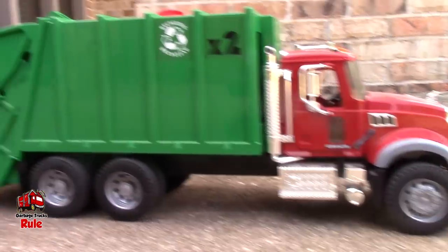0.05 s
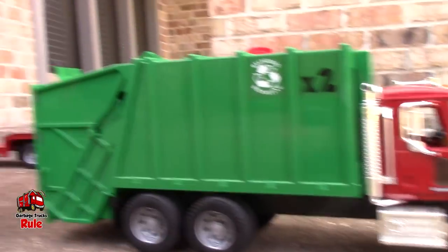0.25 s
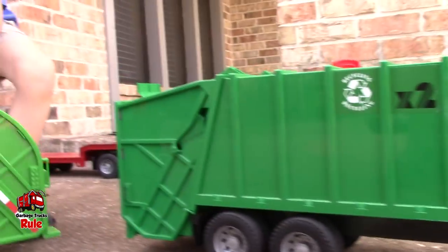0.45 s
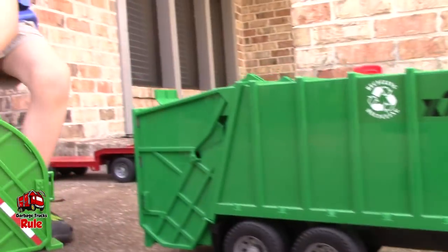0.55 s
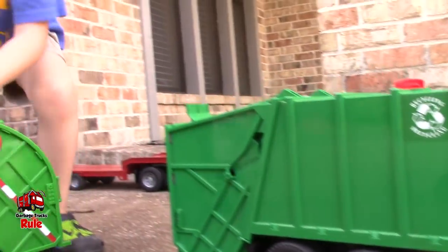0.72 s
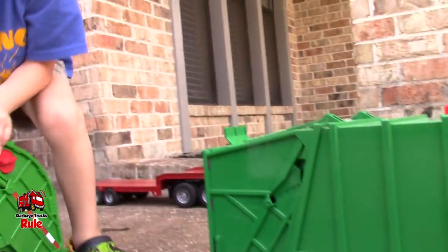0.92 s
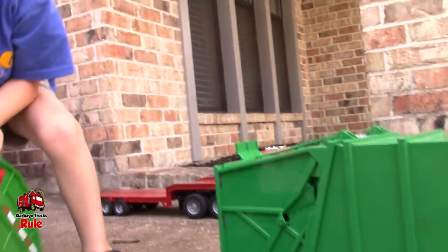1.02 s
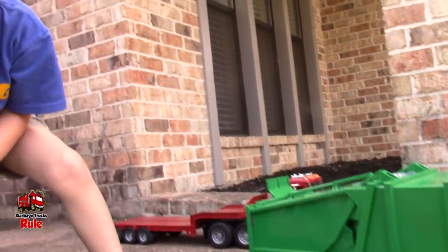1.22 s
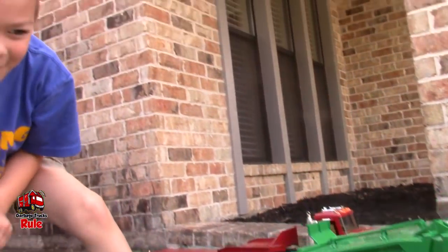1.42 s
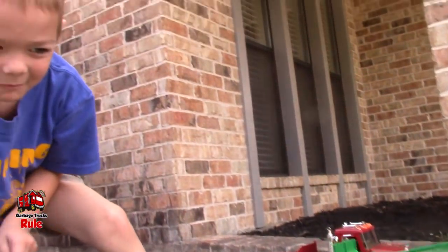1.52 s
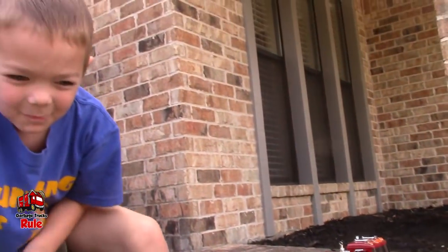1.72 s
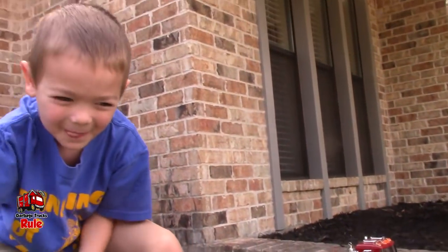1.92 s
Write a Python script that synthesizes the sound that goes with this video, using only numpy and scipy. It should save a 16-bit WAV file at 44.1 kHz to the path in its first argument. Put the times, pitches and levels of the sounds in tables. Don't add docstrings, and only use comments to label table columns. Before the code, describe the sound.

Hard plastic toy truck wheels rattle and rumble over rough concrete, then stop with a knock

```python
import sys
import numpy as np
from scipy import signal
from scipy.fft import rfft, irfft, next_fast_len
from scipy.io import wavfile

SR = 44100
rng = np.random.default_rng(int(sys.argv[2]) if len(sys.argv) > 2 else 0)


def wrap_up_sound(samples):
    columns = np.atleast_2d(samples).T
    tamed = np.clip(columns, -1, 1)
    steps = np.round(tamed * 32767).astype(np.int16)
    wavfile.write(sys.argv[1], SR, steps)


def field_ratio(decibels):
    return 10 ** (np.asarray(decibels, dtype=float) / 20)


N = 85995
GRIT_PER_S, CHATTER_PER_S = 1193, 3460

# pitch_hz, width_hz, level_db
BOX_MODES = [(288, 97, -7.5), (393.5, 90, -2.5), (460, 60.4, 0), (513, 48, -6), (592, 127, -6)]
# pitch_hz, width_hz, level_db
PANEL_MODES = [(711, 34, -0.5), (840, 67, 5), (1040, 53, 0), (1400, 121, 5.5), (1558, 360, 5.5),
               (2174, 560, 4), (2430, 197, 2), (2750, 330, 2), (3050, 75, -4), (3450, 100, -7.5),
               (3900, 750, -48)]
# frequency_hz, level_db_per_hz
PLASTIC_BULK = [(35, -99), (130, -2.5), (445, -8.5), (588, 2.5), (1050, 7.5), (1240, -2.5), (2870, -12.5),
                (7450, -33), (15700, -53)]


def rms_one(x):
    return x / np.sqrt(np.mean(x ** 2) + 1e-20)


def filtered(x, order, cutoff_hz, kind="low"):
    return signal.sosfilt(signal.butter(order, cutoff_hz, kind, fs=SR, output="sos"), x)


def colour(x, points):
    size = next_fast_len(N + 4096)
    hz = np.fft.rfftfreq(size, 1 / SR) + 1
    points_hz, points_db = np.transpose(points)
    gain = field_ratio(np.interp(np.log(hz), np.log(points_hz), points_db))
    cepstrum = irfft(np.log(gain), size)
    cepstrum[1:size // 2] *= 2
    cepstrum[size // 2 + 1:] = 0
    return irfft(rfft(x, size) * np.exp(rfft(cepstrum)), size)[..., :N]


def drift(rate_hz):
    r = np.exp(-2 * np.pi * rate_hz / SR)
    wander = signal.lfilter([1], [1, -2 * r, r * r], rng.standard_normal(N + SR))
    return rms_one(wander[SR:])


def resonate(x, pitch_hz, width_hz):
    r = np.exp(-np.pi * width_hz / SR)
    feed = np.sqrt((1 - r * r) / 2) * np.array([1, 0, -1])
    return signal.lfilter(feed, [1, -2 * r * np.cos(2 * np.pi * pitch_hz / SR), r * r], x + 1e-18)


def grains(per_s, spread_db=3.5):
    sizes = field_ratio(spread_db * np.minimum(rng.exponential(1, N), 4)) * rng.choice([-1, 1], N)
    contact = np.clip((per_s / SR - rng.random(N)) * 200, 0, 1)
    return rms_one(sizes * contact)


def body(modes, drive):
    gains = field_ratio(np.array(modes)[:, 2])
    total = np.zeros(N)
    for k, (pitch_hz, width_hz, _) in enumerate(modes):
        total += gains[k] * (-1) ** k * resonate(drive(k), pitch_hz, width_hz)
    return total / np.sqrt(np.sum(gains ** 2))


def rolling():
    # time_s, level_db
    roll_force = [(0, -55), (0.074, -31.5), (0.124, -42.5), (0.149, -26.5), (0.207, -43.5), (0.263, -29.5),
                  (.345, -31.5), (0.398, -25), (.62, -17), (.8, -14), (1.25, -14.5), (1.39, -22.5),
                  (1.427, -35), (1.612, -25), (1.618, -12), (1.668, -18), (1.699, -27.5), (1.95, -45.5)]
    time_s, force_db = np.transpose(roll_force)
    force_db = np.interp(np.arange(N) / SR, time_s, force_db)
    peak_db = force_db.max()
    upper_db = peak_db + 1.62 * (force_db - peak_db) + 3.34 * drift(41)
    grit = grains(GRIT_PER_S)

    def box_drive(k):
        return (grit + grains(GRIT_PER_S)) * field_ratio(force_db - 1 + 2 * drift(32))

    def panel_drive(k):
        return grains(GRIT_PER_S) * field_ratio(upper_db - 7.5)

    box = body(BOX_MODES, box_drive)
    panels = body(PANEL_MODES, panel_drive)
    bulk = field_ratio(upper_db - 5.5) * rms_one(colour(grains(CHATTER_PER_S), PLASTIC_BULK))
    return filtered(box + panels + bulk, 2, 6500)


def shaking(rows, level_db, accent_db):
    span = 8000
    out, t = np.zeros(N + span), np.arange(span) / SR
    tail = field_ratio(-15) * np.exp(-t / 0.026)
    for row, db, accent in zip(rows, level_db, accent_db):
        start, length_s = int(row[0] * SR), max(row[3], 0.001)
        head = field_ratio(accent) * np.exp(-(t / length_s) ** 2)
        rise = 1 - np.exp(-t / (0.00011 + 0.059 * length_s))
        out[start:start + span] += field_ratio(db) * rise * (head + tail)
    return out[:N]


def rattles():
    # start_s, level_db, treble_share_db, length_s, pitch_hz
    nudges = [(.022,-19.5,-8,0.0052,3900),(.0355,-24,-5,0.0036,3900),(.043,-14.5,-7.5,0.0041,3050),(.057,-44,0,0.017,3450),(.079,-10.5,-31,0.0066,1400),(.140,-23,-47,0.0077,1040),(.2165,-8,-30,0.0081,2730),(.270,-11,-32,0.021,1400),(.295,-9,-17.5,0.0072,3450),(.317,-34,-1,0.0044,7400),(.363,-26,2,0.0011,3900),(.371,-29,-11,0.0041,5700),(.380,-1.5,-32,0.006,2750),(.415,-11.5,-32,0.0097,1400),(.470,-7,-24,0.0054,1400),(.493,-30,0.5,0.0031,7400),(.506,-24,-14,0.0034,7400),(.525,-18,-47,0.021,2430),(.542,-1.5,-18.5,0.006,3450),(.562,-22,-15,0.0032,1400),(.592,2,-22.5,0.01,7400),(.628,-16,-11,0.0061,7400)]
    # start_s, level_db, treble_share_db, length_s
    bumps = [(0.6509, 4.5, -22.5, 0.027), (0.691, -7.5, -15, 0.078), (0.7477, -4, -11.5, 0.045),
             (0.8096, 6.5, -18, 0.0056), (0.851, -6, -26, 0.014), (0.896, -6.5, -17.5, 0.091),
             (0.9106, -14.5, -18, 0.042), (0.9285, -6, -10.5, 0.046), (0.947, -2, -36, 0.042),
             (0.9787, -10, -20, 0.0052), (1.0004, -23, -1, 0.011), (1.026, -3, -20, 0.062),
             (1.042, -7.5, -14, 0.071), (1.065, -27, -21, 0.026), (1.0844, -30, -9, 0.074),
             (1.1154, -6, -6, 0.029), (1.143, -19, -6, 0.013), (1.1772, 0, -23.5, 0.02),
             (1.2326, 2, -16, 0.023), (1.261, -10, -19, 0.062), (1.296, -13, -27, 0.021),
             (1.329, -16, -12, 0.0034), (1.3589, -3, -29, 0.011), (1.3765, -16, -21.5, 0.019)]
    # start_s, level_db, treble_share_db, length_s, pitch_hz
    settling = [(1.429,-29,-1.5,0.0076,5700),(1.464,-46,-2,0.0017,8900),(1.489,-36,1,0.011,4900),(1.519,-27,-5.5,0.0059,2420),(1.5212,-26.5,5.5,0.0012,4400),(1.617,-5,-31,0.012,830),(1.631,-7,-10,0.025,4400),(1.657,-3.5,-34,0.0048,2750),(1.717,-19,-9.5,0.01,2750),(1.753,-20.5,-3,0.0021,2750),(1.823,-16.5,-32,0.02,1040),(1.876,-64,18,0.0047,5700),(1.895,-25,-1,0.0023,7400),(1.917,-33.5,12,0.0013,3050),(1.942,-36,6,0.0047,5700)]
    # pitch_hz, width_hz, level_db
    axle_modes = [(4400, 330, -3), (4900, 57, -5.5), (5700, 390, -6), (7400, 250, -1.5), (8900, 3200, -4)]
    rows = [*nudges, *bumps, *settling]
    low_db, share_db = np.array([row[1:3] for row in rows]).T
    high_db, even_db = low_db + share_db, np.zeros(len(rows))
    favoured_hz = np.array([row[4] if len(row) > 4 else 20 for row in rows])
    chatter, ticks = grains(CHATTER_PER_S), grains(1706, spread_db=2)

    def ring(modes, level_db):
        def drive(k):
            octaves = np.log2(modes[k][0] / favoured_hz)
            favour = np.exp(-(octaves / 0.16) ** 2) - (favoured_hz > 20) / 4
            accent_db = 3 * rng.standard_normal(len(rows)) + 7 * favour
            return chatter * shaking(rows, level_db, accent_db)
        return body(modes, drive)

    def treble(x):
        return filtered(colour(x, PLASTIC_BULK), 2, 4200, "high")

    bulk = colour(chatter * shaking(rows, low_db - 18.5, even_db), PLASTIC_BULK)
    bulk = bulk / colour(chatter, PLASTIC_BULK).std()
    fizz = treble(ticks * shaking(rows, high_db - 1.5, even_db)) / treble(ticks).std()
    dull = ring(PANEL_MODES, low_db - 11.5) + ring(BOX_MODES, low_db - 15) + bulk
    return filtered(dull, 3, 3130) + ring(axle_modes, high_db - 12) + fizz


def thumps():
    # start_s, peak_db, rocking_pitch_hz
    wheel_drops = [(0.042, -22, 506), (0.068, -41, 500), (0.083, -18, 502), (0.141, -27, 452),
                   (0.218, -8, 480), (0.264, -13, 464), (0.277, -1, 510), (0.368, -13, 470),
                   (0.385, -6, 460), (0.419, -8.5, 470), (0.47, -7.5, 463), (0.504, -2.5, 460),
                   (0.564, -5.5, 448), (0.597, -5, 480), (0.608, -1.5, 460), (0.657, 1, 430),
                   (0.68, -3, 473), (0.725, -7, 447), (0.868, -2, 532), (0.912, -10, 544), (0.983, 0, 410),
                   (1.034, 3, 447), (1.126, -5.5, 422), (1.182, -2, 460), (1.359, -22, 474),
                   (1.439, -27, 473), (1.523, -15, 460), (1.55, -29, 436), (1.582, -9, 470),
                   (1.617, 0, 648), (1.77, -34, 455), (1.83, -21.5, 620)]
    span, rock_s = 900, 0.0077
    t, push = np.arange(span) / SR, np.zeros(N + span)
    swell = np.sin(np.pi * np.clip(t / rock_s, 0, 1)) ** 2
    for start_s, peak_db, rock_hz in wheel_drops:
        start = int(start_s * SR)
        push[start:start + span] += field_ratio(peak_db - 6.5) * swell * np.sin(2 * np.pi * rock_hz * t)
    push = push[:N]
    return push + field_ratio(-24) * body(BOX_MODES, lambda k: push * (-1) ** k)


def taps():
    # start_s, peak_db, pitch_hz, decay_s
    loose_taps = [(.2175, -18, 2540, 0.003), (.217, -19, 1320, 0.0013), (.292, -15, 1450, .003),
                  (.3005, -23, 1400, .002), (.351, -23, 9000, .00008), (.3755, -10.5, 11000, 0.00007),
                  (0.38, -14.5, 1500, .003), (.523, -17, 1500, .002), (.530, -26, 13000, .00008),
                  (.7526, -9, 4960, .002), (.765, -14, 4900, 0.0028), (.811, -6.5, 2995, 0.0061),
                  (.934, -22, 7460, .003), (.943, -10, 4950, 0.0038), (.980, -2, 1400, .004),
                  (1.054, -8, 4760, 0.0012), (1.066, -4, 2920, 0.0091), (1.067, -13, 5440, 0.0024),
                  (1.123, -26, 7300, .002), (1.123, -5.5, 3480, 0.0045), (1.1795, -5, 3000, 0.0033),
                  (1.180, -11, 5900, 0.0023), (1.241, -24, 2900, .003), (1.243, -15.5, 6100, 0.0037),
                  (1.331, -23, 5500, .002), (1.366, -19, 4970, 0.0022), (1.381, -27, 2060, 0.0022),
                  (1.5195, -14.5, 2480, .004), (1.5200, -18, 4400, 0.0027), (1.562, -24.5, 5960, 0.0015),
                  (1.5685, -34, 4300, 0.0033), (1.6175, -7, 805, 0.0036), (1.4645, -20, 12000, .00008),
                  (1.619, -4, 12000, .00008), (1.633, -3, 11000, .00008), (1.664, -11, 12000, .00008),
                  (1.693, -30, 10000, .0001), (1.759, -30, 4050, .002), (1.822, -34, 7040, .002),
                  (1.8935, -22, 10000, .00015), (1.9167, -24, 3050, .0012), (1.943, -23, 10000, .00012)]
    span, bounce_s, bounce_loss_db, detune = 1500, 0.0012, 3, 0.07
    t, out = np.arange(span) / SR, np.zeros(N + 2000)
    for start_s, peak_db, pitch_hz, decay_s in loose_taps:
        decay_s = max(decay_s, 4e-5)
        shape = (1 - np.exp(-t / (0.052 * decay_s))) * np.exp(-t / decay_s)
        for k, (late, off) in enumerate(rng.uniform(-1, 1, (3, 2))):
            start = int((start_s + bounce_s * k * (1 + late / 2)) * SR)
            hit_hz = pitch_hz * (1 + detune * off * (k > 0))
            level = field_ratio(peak_db - bounce_loss_db * (k + 1))
            out[start:start + span] += level * shape * np.sin(2 * np.pi * hit_hz * t)
    return out[:N]


def scuff():
    # time_s, level_db
    drag = [
        (1.418, -47.5),
        (1.5, -43.5),
        (1.57, -31),
        (1.658, -30),
        (1.7, -41.5),
        (1.8, -40),
        (1.86, -48),
        (1.919, -32),
        (1.95, -49),
    ]
    time_s, drag_db = np.transpose(drag)
    crunch = rms_one(filtered(grains(4900, spread_db=3), 2, [1080, 7400], "band"))
    return crunch * field_ratio(np.interp(np.arange(N) / SR, time_s, drag_db, left=-120) + 2.7 * drift(29))


def wall_echo(x):
    # delay_s, level_db
    reflections = [(.0043, -24.5)]
    dull = signal.lfilter([0.6], [1, -0.4], x)
    return x + sum(field_ratio(db) * np.pad(dull, (int(delay_s * SR), 0))[:N] for delay_s, db in reflections)


def yard_air():
    # frequency_hz, level_db_per_hz
    air_spectrum = [(30, 17), (90, 8.5), (200, 10), (800, -13), (1500, -21.5), (15000, -33.5)]
    return field_ratio(-38) * rms_one(colour(rng.standard_normal(N), air_spectrum))


def two_ports(mid):
    # frequency_hz, side_minus_mid_db
    port_width = [(60, -16), (300, -26.5), (1200, -28), (6000, -15), (15000, -19)]
    scatter = rng.standard_normal(6000) * np.exp(-np.arange(6000) / SR / 0.03)
    scatter = scatter / np.linalg.norm(scatter)
    side = colour(signal.fftconvolve(mid, scatter)[:N], port_width)
    side = side + 0.09 * filtered(mid, 1, 3500, "high")
    return np.array([mid + side, mid - side])


def scene():
    sources = rolling() + rattles() + thumps() + taps() + scuff()
    return two_ports(wall_echo(sources) + yard_air())


def top_cut(x):
    return signal.sosfilt(signal.butter(12, 15840, fs=SR, output="sos"), x)


def record(dry):
    ceiling = 0.88
    x = filtered(ceiling * np.tanh(dry / ceiling), 3, 120, "high")
    x = np.clip(x, -ceiling, ceiling)
    x = signal.sosfilt(signal.cheby2(12, 70, 16500, fs=SR, output="sos"), x)
    return top_cut(x)


dry = scene()
out = record(dry)
wrap_up_sound(out)
```